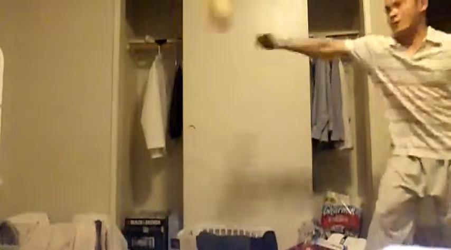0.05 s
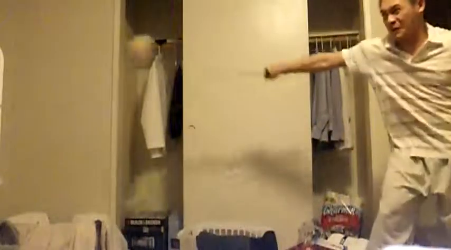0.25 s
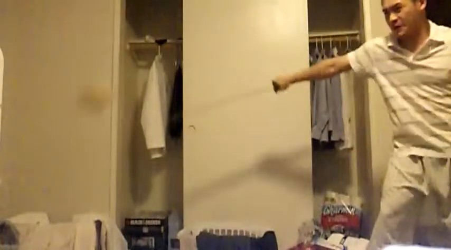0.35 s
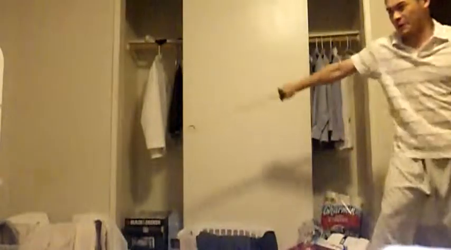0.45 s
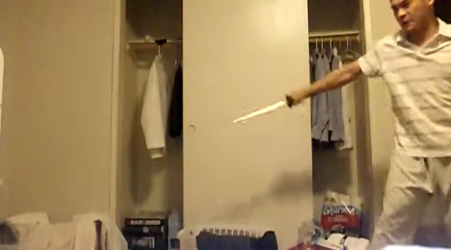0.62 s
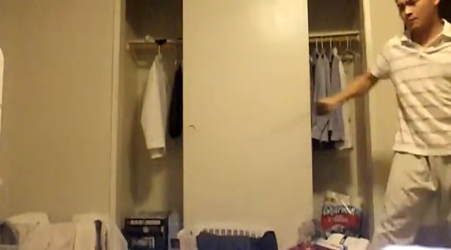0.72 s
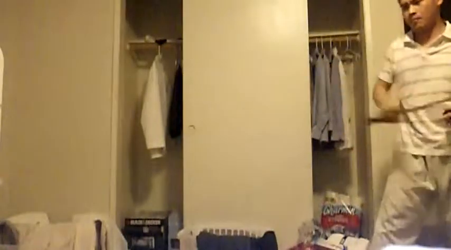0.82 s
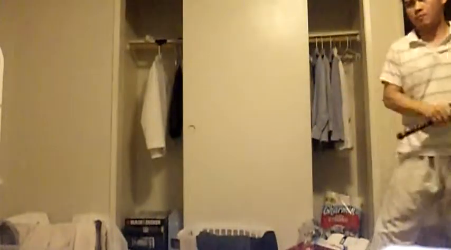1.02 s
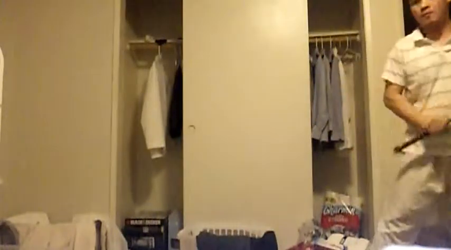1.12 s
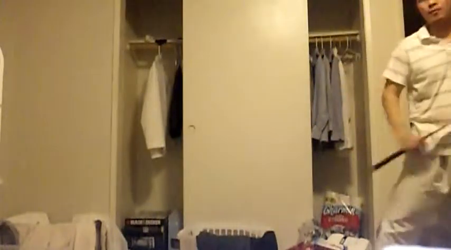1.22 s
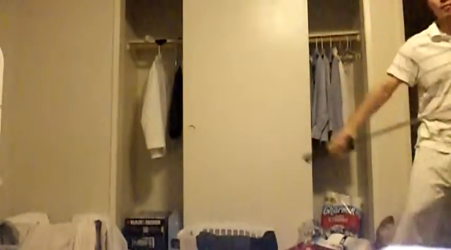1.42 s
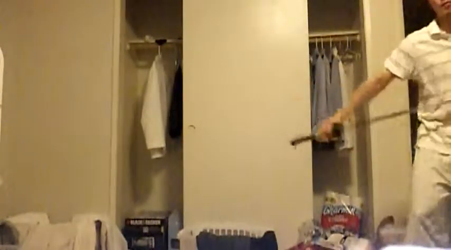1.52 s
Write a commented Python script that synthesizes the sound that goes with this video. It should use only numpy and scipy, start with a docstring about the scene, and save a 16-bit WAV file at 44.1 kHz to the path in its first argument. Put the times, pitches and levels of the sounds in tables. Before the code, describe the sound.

A heavy, booming thud as a swishing sword strikes something in a small room.

```python
"""A sword, swung fast in a small bedroom, strikes with one heavy thud that sets the room's modes booming.
Before the hit, a steely friction scrape dies away and the blade swishes with turbulent air.
A light brush and a soft shuffle follow, over low hiss and a wavering hum.
The thud overloads a dull little microphone, which limits, clips and passes little treble."""
import sys
import numpy as np
from scipy import signal
from scipy.io import wavfile
from scipy.ndimage import uniform_filter1d

SR = 44100
rng = np.random.default_rng(int(sys.argv[2]) if len(sys.argv) > 2 else 0)


def dump_mix(stems):
    """Bounce the given channels to the path in sys.argv[1] as a 16-bit WAV at rate SR."""
    frames = np.atleast_2d(stems).T  # one column per channel
    limited = np.clip(frames, -1, 1)  # hard clip at full scale
    pcm = np.round(limited * 32767).astype(np.int16)
    wavfile.write(sys.argv[1], SR, pcm)


N = 68355
T = np.arange(N) / SR


def from_db(db):
    """Amplitude ratio of a level in decibels."""
    return 10 ** (np.asarray(db) / 20)


def at_hz(points, hz):
    """Interpolation on a logarithmic frequency axis."""
    frequencies, values = np.transpose(points)
    return np.interp(np.log(hz), np.log(frequencies), values)


def butter(x, hz, kind, order=2):
    """Causal Butterworth filter: a maximally flat passband."""
    return signal.sosfilt(signal.butter(order, hz, kind, fs=SR, output="sos"), x + 1e-18)


def noise_band(low_hz, high_hz):
    """Band-limited noise of unit rms; division by its running rms evens out slow swings."""
    band = butter(rng.standard_normal(2 * N), [low_hz, high_hz], "band", order=3)
    power = uniform_filter1d(band ** 2, size=int(3 * SR / (high_hz - low_hz)) + 1500)
    even = (band / np.sqrt(np.abs(power) + 1e-20))[N:]
    return even / np.sqrt(np.mean(even ** 2) + 1e-20)


def coloured(spectrum, envelope):
    """Incoherent third-octave bands share unit power by spectrum; envelope(hz) then scales each."""
    edges = np.geomspace(150, 4900, 16)
    centres = np.sqrt(edges[1:] * edges[:-1])
    gains = from_db(at_hz(spectrum, centres)) * np.sqrt(np.diff(edges))
    gains /= np.linalg.norm(gains)
    return sum(gain * envelope(hz) * noise_band(low, high)
               for gain, hz, low, high in zip(gains, centres, edges, edges[1:]))


def blow(start_s, t60_s, hold_s=0, attack_s=0.0032):
    """Envelope of a damped transient: linear attack, hold, then a fall of 60 dB in t60_s."""
    age = T - start_s
    return np.clip(age / attack_s, 0, 1) * np.exp(-np.log(1000) * np.maximum(age - hold_s, 0) / t60_s)


def stroke(spectrum, peak_s, peak_db, rise_db_per_s, fall_db_per_s):
    """Noise of a passing motion: exponential growth to a peak, then exponential decay."""
    level_db = peak_db - rise_db_per_s * np.maximum(peak_s - T, 0)
    level_db -= fall_db_per_s * np.maximum(T - peak_s, 0)
    return coloured(spectrum, lambda hz: from_db(level_db))


# Spectrum of the hiss: frequency_hz, relative_density_db
HISS_SPECTRUM = [(130, -19), (200, -5.5), (300, -1.5), (480, 0.5), (900, -1.5), (1500, -3.5), (2200, -7),
                 (3500, -14), (4600, -29.5)]
def hiss():
    """Stationary broadband noise with a steep low cut."""
    return butter(coloured(HISS_SPECTRUM, lambda hz: from_db(-38.5)), 171.4, "high", order=14)


# Swells of the hum: peak_s, pitch_hz, level_db, standard_deviation_s
HUM_SWELLS = [(0.07, 325.3, -45, 0.27), (0.65, 331.7, -47.5, .1), (0.66, 457, -48, 0.048),
              (0.79, 397, -49.5, .05), (1.007, 333.3, -41, 0.065), (1.105, 397, -42, 0.042),
              (1.186, 327.9, -45, 0.047), (1.3, 858, -53.5, 0.48), (1.37, 394.5, -50, 0.22),
              (1.397, 267.2, -48, 0.087)]
def hum():
    """Tones under Gaussian envelopes waver by beating with narrowband noise."""
    swells = np.zeros(N)
    for peak_s, hz, db, sigma_s in HUM_SWELLS:
        tone = np.sqrt(2) * np.sin(2 * np.pi * hz * T) + 0.15 * noise_band(hz - 15, hz + 15)
        swells += from_db(db) * np.exp(-0.5 * ((T - peak_s) / sigma_s) ** 2) * tone
    return swells


# Spectrum of the shuffle: frequency_hz, relative_density_db
SHUFFLE_SPECTRUM = [(200, -8), (500, 5), (800, -5), (1600, -35), (4000, -24)]
def shuffle():
    """Soft friction noise, mostly in the low midrange, swells and fades."""
    return stroke(SHUFFLE_SPECTRUM, peak_s=1.2, peak_db=-37.5, rise_db_per_s=390, fall_db_per_s=197)


# Spectrum of the brush: frequency_hz, relative_density_db
BRUSH_SPECTRUM = [(200, -5), (400, 2.5), (620, 2.5), (1000, -1.5), (2000, 0), (3300, -3.5), (4700, -14)]
def brush():
    """Light sliding friction as the arm draws back, with one short catch in the middle."""
    slide = stroke(BRUSH_SPECTRUM, peak_s=0.866, peak_db=-34, rise_db_per_s=296, fall_db_per_s=127)
    catch = from_db(-28.5) * coloured(BRUSH_SPECTRUM, lambda hz: blow(0.8585, t60_s=0.12))
    return slide + catch


# Spectrum of the friction: frequency_hz, relative_density_db
SCRAPE_SPECTRUM = [(170, -9), (320, 7.5), (700, -1.5), (1200, 4), (2400, -2.5), (3500, 0), (4700, -1)]
# Resonances of the blade: pitch_hz, bandwidth_hz, relative_level_db
BLADE_RESONANCES = [(1112, 84, -16.5), (1882, 130, 0.5), (2923, 140, -8), (4250, 140, -18),
                    (4545, 37, -13.5)]
def scrape():
    """Friction excites the steel's resonances; both decay exponentially, the treble first."""
    rub_fall = [(300, 114.5), (4000, 178)]  # frequency_hz, fall_db_per_s
    steel_fall_db_per_s = 243.5
    rub = coloured(SCRAPE_SPECTRUM, lambda hz: from_db(-21.5 - at_hz(rub_fall, hz) * T))
    steel = sum(from_db(db) * noise_band(hz - width / 2, hz + width / 2)
                for hz, width, db in BLADE_RESONANCES)
    return rub + steel * from_db(-23 - steel_fall_db_per_s * T)


# Spectrum of the air rushing past the blade: frequency_hz, relative_density_db
SWISH_SPECTRUM = [(150, -4.5), (400, 0), (900, -4), (1800, -10.5), (3000, -7.5), (3700, -16.5),
                  (4700, -18.5)]
def swish():
    """Turbulence noise peaks at the blade's top speed; air pushed ahead of it makes a low puff."""
    rush = stroke(SWISH_SPECTRUM, peak_s=0.22, peak_db=-25, rise_db_per_s=187.5, fall_db_per_s=209)
    puff_s, slope_db_per_s = 0.205, 339
    puff = noise_band(40, 120) * from_db(-48.5 - slope_db_per_s * np.abs(T - puff_s))
    return rush + puff


# Modes of the room: pitch_hz, relative_level_db, t60_s
ROOM_MODES = [(182.2, -4.5, 0.24), (213.6, 1.5, .39), (242, -2, 0.37), (275.8, -3.5, 0.54),
              (313.6, -2, .27), (337.4, 1.5, 0.33), (425.6, -10, 0.405), (455.9, -9.5, 0.6),
              (503.8, -5, 0.46), (554.6, -8.5, 0.55), (585.7, -7.5, 0.52), (676.8, -11.5, 0.25),
              (790, -14.5, 0.42), (922, -16, 0.44), (998, -18.5, 0.76)]
def room_boom(hit_s, build_s=0.04):
    """Standing waves of alternating sign build up after the hit, then decay at their own rates."""
    age = np.maximum(T - hit_s, 0)
    modes = sum((-1) ** k * from_db(db) * np.sin(2 * np.pi * hz * age) * blow(hit_s, t60_s, build_s)
                for k, (hz, db, t60_s) in enumerate(ROOM_MODES))
    return from_db(-8.5) * np.minimum(age / build_s, 1) * modes


# Spectrum of the thud's dense body: frequency_hz, relative_density_db
BODY_SPECTRUM = [(130, -27.5), (190, 2), (320, 7), (500, 1), (700, -4.5), (950, -8), (1400, -12.5),
                 (2000, -16), (2800, -20.5), (3400, -37), (4200, -58)]
# Reverberation time of that body: frequency_hz, t60_s
BODY_DECAY = [(150, 0.56), (400, 0.49), (1000, 0.64), (2000, 0.31), (4000, .2)]
def reverberation(hit_s):
    """Dense reflections merge into noise whose decay time depends on frequency."""
    tail = coloured(BODY_SPECTRUM, lambda hz: blow(hit_s, at_hz(BODY_DECAY, hz), hold_s=0.065))
    return from_db(-10) * tail


# The direct smack and its first wall reflections: start_s, relative_level_db
SMACK_ARRIVALS = [(0.2314, 0), (0.241, 3.5), (0.251, 1), (0.281, -15.5), (0.309, -3)]
# Spectrum of the smack: frequency_hz, relative_density_db
SMACK_SPECTRUM = [(170, -18), (300, -2), (450, 3.5), (680, -5.5), (950, -6.5), (1400, -24), (2600, -18.5),
                  (3200, -25.5), (4200, -60)]
def smack(level_db=-3):
    """The contact noise and its early reflections add incoherently, so their powers sum."""
    power = sum((from_db(level_db + db) * blow(start_s, t60_s=0.043)) ** 2
                for start_s, db in SMACK_ARRIVALS)
    return coloured(SMACK_SPECTRUM, lambda hz: np.sqrt(power))


def thud(hit_s=0.2298):
    """Impulsive excitation of a room: the sword's smack, with boom, reverberation and faint rumble."""
    impact = room_boom(hit_s) + reverberation(hit_s) + smack()
    rumble = from_db(-44.5) * noise_band(25, 85) * blow(hit_s, t60_s=1)
    return butter(impact, 111, "high", order=5) + rumble


def scene():
    """Linear superposition of all sources at one microphone."""
    air = swish()
    friction = butter(brush() + shuffle() + scrape(), 159, "high", order=10)
    return (air + friction + thud() + hiss() + hum())[None]


def limiter(x, threshold_db=1.0, attack_s=0.0024, release_db_per_s=301.5):
    """Automatic gain control: peaks above the threshold lower the gain, which recovers steadily."""
    excess_db = np.maximum(20 * np.log10(np.abs(x) + 1e-9) - threshold_db, 0)
    recovery_db = release_db_per_s * T
    held_db = np.maximum.accumulate(excess_db + recovery_db, axis=-1) - recovery_db
    pole = np.exp(-1 / (attack_s * SR))
    reduction_db = signal.lfilter([1 - pole], [1, -pole], held_db)
    return x * from_db(-reduction_db)


def record(dry):
    """Saturation: the limited thud overloads a narrowband preamp, and the top peaks clip again."""
    preamp_ceiling, output_ceiling, treble_limit_hz = 0.76, 0.715, 4850
    driven = np.clip(limiter(dry), -preamp_ceiling, preamp_ceiling)
    dull = signal.sosfilt(signal.ellip(10, 0.3, 80, treble_limit_hz, fs=SR, output="sos"), driven)
    clipped = np.clip(dull, -output_ceiling, output_ceiling)
    return butter(clipped, 15800, "low", order=12)


dry = scene()
out = record(dry)
dump_mix(out)
```